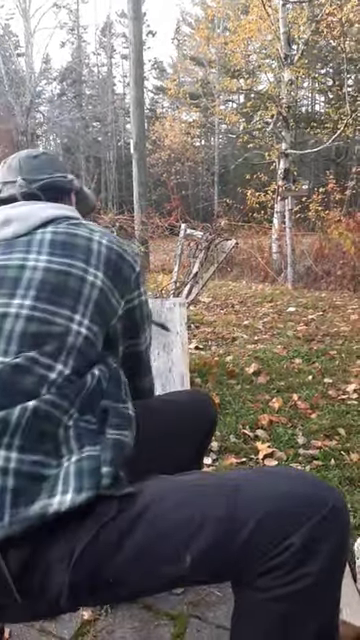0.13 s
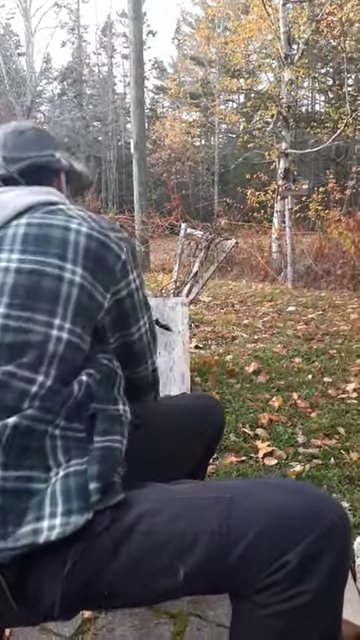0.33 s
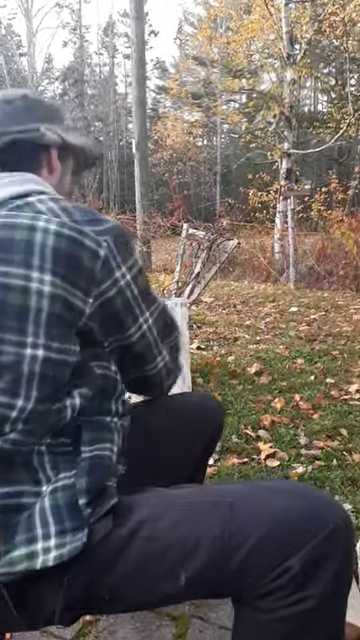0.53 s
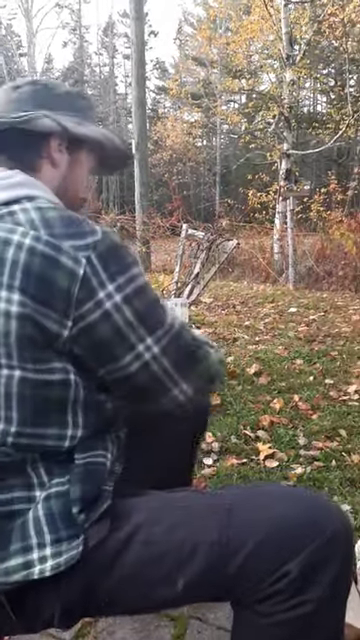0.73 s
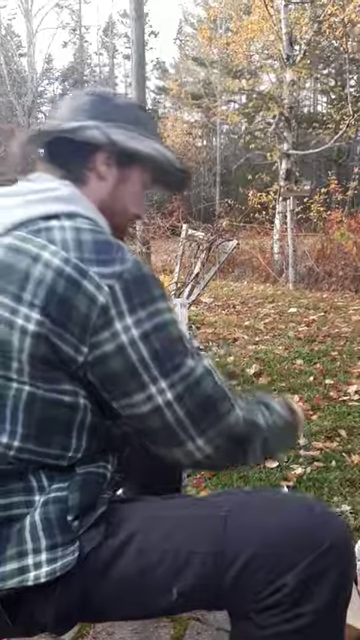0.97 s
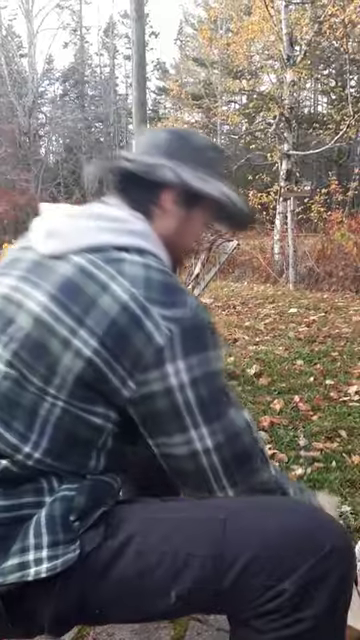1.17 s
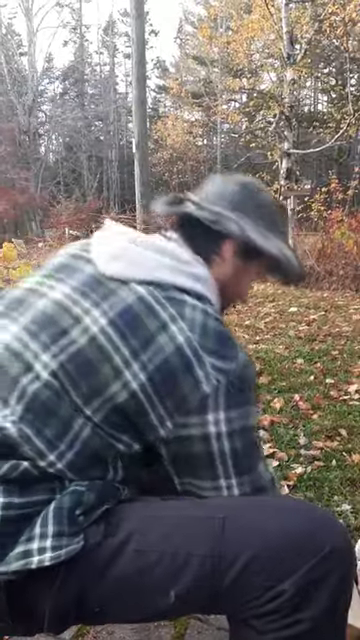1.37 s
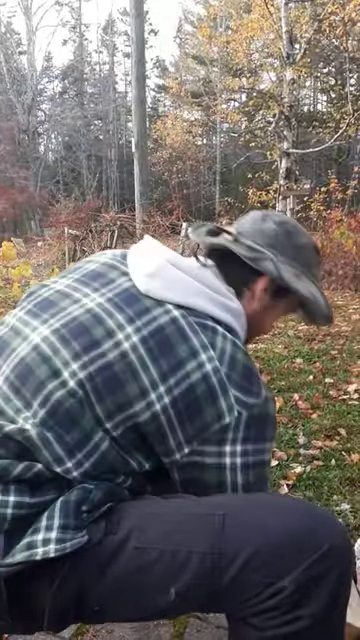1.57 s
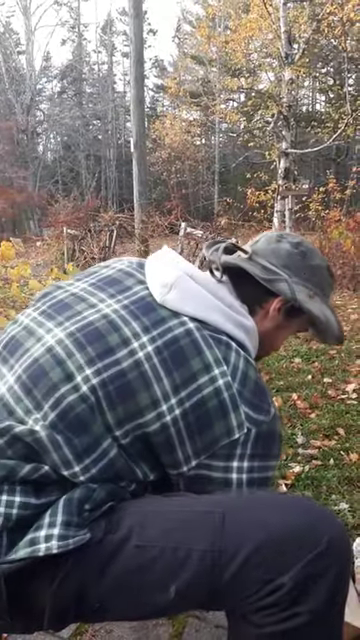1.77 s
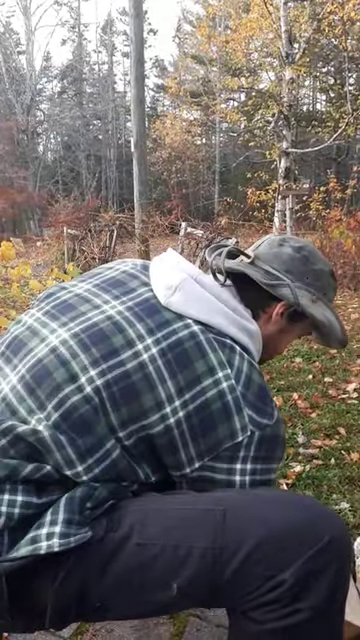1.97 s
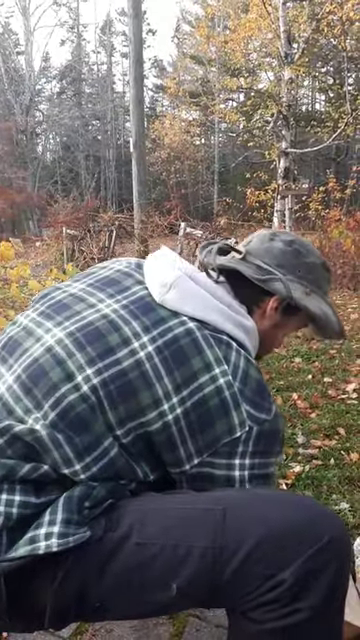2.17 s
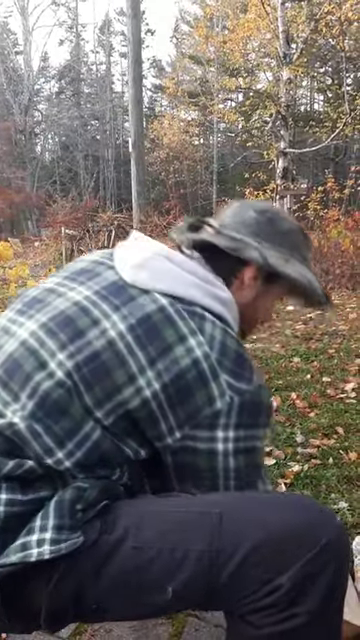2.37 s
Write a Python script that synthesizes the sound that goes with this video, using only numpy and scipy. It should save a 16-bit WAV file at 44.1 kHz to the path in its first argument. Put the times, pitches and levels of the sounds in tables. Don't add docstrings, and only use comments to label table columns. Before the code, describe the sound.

A thrown knife strikes a wooden stump a few metres off at about 0.22 s: a sharp fibre crack and short, dull, low thud, with quick tree echoes and a scattered tail fading by roughly 0.6 s. Faint cloth rustle precedes it. Quiet ticks, hollow knocks and brushing follow, notably near 1.05, 1.4 and 2.3 s, over soft leaf hiss and road hum; a distant car swells faintly around 1.6 s.

```python
import sys
import numpy as np
from scipy import signal
from scipy.fft import rfft, irfft
from scipy.io import wavfile
from scipy.ndimage import uniform_filter1d

SR = 44100
rng = np.random.default_rng(int(sys.argv[2]) if len(sys.argv) > 2 else 0)


def magnitude_from_level(level_db):
    exponent = np.asarray(level_db, float) / 20
    return 10 ** exponent


def wrap_up_sound(samples):
    columns = np.atleast_2d(samples).T
    tamed = np.clip(columns, -1, 1)
    steps = np.round(tamed * 32767).astype(np.int16)
    wavfile.write(sys.argv[1], SR, steps)


N = 105840

MS = np.array([[1, 1], [1, -1]])
# resonance in Hz, width in Hz, level in dB.
PORT = [(6850, 1100, -0.5), (4500, 1040, -15), (11470, 4000, -9), (2760, 740, -12.5), (7904, 900, -3.5)]
# frequency in Hz, density in dB per Hz.
ROAD_MID = [(15, -59.5), (25, -31), (48, -5.5), (103, 2.5), (248, -8), (330, -7.5), (444, -15), (1000, -4),
            (2600, -25.5), (3380, -29), (5720, -120)]
ROAD_SIDE = [(15, -50), (25, -8), (80, -2.5), (225, -8), (479, -12.5), (721, -4.5), (1110, -7.5),
             (2020, -9.5), (2600, -24), (3380, -43), (5720, -120)]
# frequency in Hz, density in dB per Hz.
HISS_MID = [(1350, -28.5), (2300, -8), (5160, -5), (6610, 1), (9340, -13.5), (11600, -5), (14900, -9),
            (15800, -8), (16500, -41)]
HISS_SIDE = [(1350, -33), (2300, -7), (3620, -12.5), (7180, -7), (9420, -9.5), (11200, -8), (14900, -9),
             (16000, -31), (16500, -55.5)]
# time in seconds, road in dB, leaves in dB.
SWELL = [(0, -0.5, 5), (.2, -1, 0), (.5, 1.5, 0.5), (.9, 1.5, -1), (1.3, 1, 0), (1.7, 0.5, 1), (2.05, 1, 0),
         (2.4, 0, 1.5)]
# mode in Hz, level in dB, t60 in seconds.
BLADE = [(3225, -69.5, 0.32), (4370, -71, 0.67), (5660, -68, 0.29), (6850, -106, 0.64)]
# start in seconds, length in seconds, level in dB, centre in Hz.
RUSTLES = [
    (0.019, 0.448, -68, 6500),
    (0.495, 0.28, -67, 5570),
    (1.355, 0.129, -71, 4500),
    (2, 0.097, -65.5, 11330),
    (2.286, .08, -67, 5450),
    (2.295, 0.065, -70.5, 2990),
]
# mode in Hz, t60 in seconds, swing left, swing right (peak amplitudes).
BODY = [(144, .015, .277, .304), (276, .012, .426, .432), (324, .0234, -.348, -.413),
        (450, .065, -.155, -.36)]
GRAIN = [(727, .08, .082, .035), (853, .05, .021, .025), (885, .038, -.041, -.048), (1130, .015, .062, .04)]
FIBRES = [(1017, 0.072, 0.018, 0.034), (1219, 0.04, 0.024, 0.021), (1325, 0.05, 0.0084, .008),
          (2780, 0.035, 0.008, .005), (4270, 0.02034, 0.0037, .002), (5120, .02, .003, .003),
          (5730, .015, 0.0023, 0.0017), (6750, 0.016, 0.022, 0.015)]
SPLINTERS = [(1510, .04, 0.0049, .004), (1790, 0.055, 0.013, 0.0059), (1863, 0.05, 0.006, 0.0013),
             (2247, .03, 0.0056, 0.0016)]
# start in seconds,
# peak in dB, tone in Hz, pan in dB, broad edge in dB.
TICKS = [(0.226, -43, 6500, -1, -20), (0.2287, -52.5, 8800, 2, -3), (0.2295, -46, 11500, 0, -3),
         (0.3694, -48.5, 6350, -2, -18.5), (0.5015, -51.5, 6630, -6.5, -10), (0.5539, -51, 6680, 1.0, -10),
         (0.582, -59, 3000, 0, 0), (0.5947, -52.5, 4870, -6.5, -17), (0.9357, -55.5, 6600, 1, -13.5),
         (1.0463, -56.5, 11000, 0.5, -0.5), (1.0477, -44.5, 6220, -1, -4), (1.0482, -50, 11800, -1, -5.5),
         (1.058, -55.5, 6300, 0, -13), (1.1167, -54, 8500, 4.5, -2), (1.118, -56, 5660, 7, -9),
         (1.2196, -52, 6590, -3, -5.5), (1.2377, -56, 6600, 5.5, -10.5), (1.37, -61, 6500, -0.5, -15),
         (1.377, -45, 6474, 0, -4), (1.377, -49, 4710, -0.5, -0.5), (1.3786, -49, 6970, 0.5, -5.5),
         (1.3894, -54, 6330, -5, -4.5), (1.4025, -54.5, 6500, 0.5, -15), (1.4056, -51, 6480, 0.5, -12),
         (1.4506, -56, 6400, -1, -14.5), (1.4608, -43, 6700, -4, -11), (1.4616, -49.5, 4700, -3, -4.5),
         (1.7264, -62.5, 6930, 4.5, -0.5), (2.2975, -55, 4200, -12, -12), (2.3004, -50.5, 6700, -2, -6),
         (2.302, -44, 6230, -5, -10), (2.3148, -46.5, 4270, -6, -12), (2.3158, -51.5, 6700, -0.5, -7),
         (2.319, -55.5, 4230, 1, -18.5), (2.3363, -59, 7200, 2.0, -9), (2.3385, -51, 4700, 2, -11),
         (2.343, -55.5, 7100, 7, -7.5), (2.3564, -59.5, 6830, 0.5, -5.5)]
# start in seconds, peak in dB, tone in Hz, pan in dB.
TRUNKS = [(.228, -40, 1840, 2), (.232, -44, 1200, -3), (.237, -46.5, 1800, 2), (.24, -36.5, 1250, 4.5),
          (.247, -48.5, 1800, 6), (.253, -50, 1240, 0), (.262, -59, 1150, 0), (.277, -44.5, 1150, -2),
          (.283, -48, 1220, 4.5), (.291, -51, 1394, -5), (.277, -48, 716, 12.5), (.293, -47.5, 671, 5.5),
          (.3, -48, 730, 11), (.319, -53, 925, 2.5), (.334, -51.5, 888, 8), (.35, -48.5, 830, 5),
          (.397, -56.5, 1090, 0.5), (.399, -57, 1745, -1.5), (.45, -54, 1110, 0), (.48, -55.5, 1000, 0)]
# delay in seconds, level in dB, top in Hz, side share (ratio).
ECHOES = [(0.0135, -15, 200, 0.035), (.025, -27, 400, 0), (.035, -18, 200, 0.021),
          (0.054, -28, 300, -0.204), (.065, -29.5, 348, 0.061), (0.075, -29.5, 915, -0.021),
          (.087, -36, 262, 0.034), (0.102, -28, 168, 0.081), (.108, -22.5, 170, -0.072)]
# centre in Hz, width in Hz, level in dB, t60 in seconds.
WOODS = [(182.8, 110, -39, .24), (331.55, 200, -44, 0.34), (731.7, 270, -54.5, 0.47),
         (1150, 400, -56, 0.55), (1900, 1015, -59.5, 0.308), (7460, 14000, -59.5, 0.2)]
# start in seconds, peak in dB, tone in Hz, pan in dB.
KNOCKS = [(.554, -57, 1563, -12), (.583, -56.5, 2480, 7.5), (.976, -51.5, 1860, 3),
          (1.239, -59, 1900, -2.5), (1.278, -54, 782, 8), (1.3776, -52.5, 1883, 8),
          (1.3772, -52.5, 3030, 6), (1.461, -58, 2980, -3), (1.048, -58, 2610, 0),
          (1.378, -52.5, 1377, -5.5), (1.378, -55.5, 822, 12), (1.725, -53, 1558, -4.5),
          (1.727, -54, 854, 9), (2.006, -58, 109.5, 0.5), (2.021, -59, 1520, -13.5), (2.178, -57.5, 142, 3),
          (2.316, -72, 1100, -4), (2.318, -58, 1992, 13.5), (2.348, -54.5, 1990, 8)]

ROAD_MID_DB, ROAD_SIDE_DB = -64.5, -71.5
HISS_MID_DB, HISS_SIDE_DB = -68.5, -70
CRACKLE_PER_S, CRACKLE_DB, CRACKLE_T60_S = 300, -71.5, .008
RUSTLE_PER_S, GRAIN_SPREAD_DB = 1800, 6.5
TIP_S, TIP_DB, TIP_HOLD_S, TIP_T60_S = .2154, -33, .004, .0076
SCRATCH_S, SCRATCH_LENGTH_S = .2168, .0002
BITE_S, BITE_LENGTH_S = .21736, .0012
PUSH_S, PUSH_LENGTH_S = .21755, .00177
SPLIT_S, SPLIT_LENGTH_S = .2184, .0002
GROUND_SHARE, GROUND_LAG_S, RIGHT_LEAD_S = .57, .00358, .00014
LOW_HZ, RUMBLE_CUT_HZ = 95, 33
BOOM_HZ, BOOM_WIDTH_HZ, BOOM_CUT = 52.7, 16, .65
TICK_SPAN_S, TICK_WIDTH_HZ, TICK_T60_S, EDGE_T60_S = .04, 1100, .009, .008
TICK_SIDE, TICK_GRIT = .5124, .37
WOODS_LAG_S, WOODS_RISE_S, WOODS_SIDE = .029, .0038, .4
KNOCK_CYCLES = 13
CAR_HZ, CAR_WIDTH_HZ, CAR_S, CAR_SPAN_S, CAR_DB = 730, 140, 1.62, .27, -69.5
TOP_HZ = 15450


def ring(x, hz, t60_s):
    pole = np.exp(2j * np.pi * hz / SR - np.log(1000) / (max(t60_s, .003) * SR))
    return signal.lfilter([1], [1, -pole], x).imag


def band(x, hz, width_hz):
    return signal.lfilter(*signal.iirpeak(hz, hz / width_hz, SR), x)


def high_pass(x, hz):
    return signal.lfilter(*signal.butter(2, hz, "high", fs=SR), x)


def unit(x):
    return x / np.sqrt(np.mean(x ** 2))


def fade(start_s, t60_s, rise_s=0.000102):
    t = np.maximum(np.arange(N) / SR - start_s, 0)
    return (1 - np.exp(-t / rise_s)) * magnitude_from_level(-60 * t / t60_s)


def pan(pan_db):
    return np.array([[pan_db], [-pan_db]]) / 2


def walk(rate_hz):
    k = int(SR / rate_hz)
    steps = np.repeat(rng.standard_normal(N // k + 1), k)[:N]
    return unit(uniform_filter1d(uniform_filter1d(steps, k), k))


def port(x):
    return sum((-1) ** k * magnitude_from_level(db) * band(x, hz, width_hz) for k, (hz, width_hz, db) in enumerate(PORT))


def coloured(table, flicker_db, rate_hz):
    octave = np.log2(np.maximum(np.fft.rfftfreq(N, 1 / SR), 1))
    hz, db = np.array(table).T
    colour = magnitude_from_level(np.interp(octave, np.log2(hz), db, left=-90, right=-90))
    spectrum = rfft(rng.standard_normal(N)) * colour
    out = np.zeros(N)
    for centre in np.arange(4, 14.6, .5):
        part = irfft(spectrum * np.clip(1 - 2 * abs(octave - centre), 0, 1), N)
        out += part * magnitude_from_level(flicker_db * walk(rate_hz))
    return unit(out)


def grains(per_s):
    size_db = GRAIN_SPREAD_DB * rng.exponential(size=(2, N)).clip(0, 2.4)
    return (rng.random((2, N)) < per_s / SR) * magnitude_from_level(size_db)


def knock(start_s, peak_db, hz, pan_db):
    t = np.arange(N) / SR
    tone = fade(start_s, KNOCK_CYCLES / hz, rise_s=0.45 / hz) * np.sin(2 * np.pi * hz * (t - start_s))
    return magnitude_from_level(peak_db + pan(pan_db)) * tone / abs(tone).max()


def swell(column):
    c = np.array(SWELL)
    return magnitude_from_level(np.interp(np.arange(N) / SR, c[:, 0], c[:, column]))


def road_hum():
    mid = magnitude_from_level(ROAD_MID_DB) * coloured(ROAD_MID, 0.82, 3.9)
    side = magnitude_from_level(ROAD_SIDE_DB) * coloured(ROAD_SIDE, 1.5, 6)
    return np.array([mid, side]) * swell(1)


def leaf_hiss():
    mid = magnitude_from_level(HISS_MID_DB) * coloured(HISS_MID, 0.42, 12)
    side = magnitude_from_level(HISS_SIDE_DB) * coloured(HISS_SIDE, 0.66, 12)
    return np.array([mid, side]) * swell(2)


def crackle():
    tail = signal.lfilter([1], [1, -magnitude_from_level(-60 / (CRACKLE_T60_S * SR))], grains(CRACKLE_PER_S))
    return magnitude_from_level(CRACKLE_DB) * unit(port(tail * rng.standard_normal((2, N))))


def blade():
    t = np.arange(N) / SR
    rings = sum(magnitude_from_level(db - 60 * t / t60_s) * np.sin(2 * np.pi * hz * t) for hz, db, t60_s in BLADE)
    return rings * (t < TIP_S)


def rustles():
    t, out = np.arange(N) / SR, np.zeros((2, N))
    cloth = grains(RUSTLE_PER_S) * np.sign(rng.standard_normal((2, N)))
    for start_s, length_s, db, hz in RUSTLES:
        move = np.sin(np.pi * np.clip((t - start_s) / length_s, 0, 1))
        out += magnitude_from_level(db) * unit(band(cloth, hz, hz * 0.28)) * move
    return out


def tip():
    t, end_s = np.arange(N) / SR, TIP_S + TIP_HOLD_S
    env = np.where(t < end_s, t > TIP_S, fade(end_s, TIP_T60_S, rise_s=1e-6))
    return magnitude_from_level(TIP_DB) * port(env * rng.standard_normal((2, N))) * [[1], [.7]]


def thud():
    t = np.arange(N) / SR + np.array([[0], [RIGHT_LEAD_S]])
    out = np.zeros((2, N))
    for start_s, length_s, modes in ((SCRATCH_S, SCRATCH_LENGTH_S, FIBRES), (BITE_S, BITE_LENGTH_S, GRAIN),
                                     (PUSH_S, PUSH_LENGTH_S, BODY), (SPLIT_S, SPLIT_LENGTH_S, SPLINTERS)):
        force = np.zeros((2, N))
        for share, lag_s in ((1, 0), (GROUND_SHARE, GROUND_LAG_S)):
            force += share * np.sin(2 * np.pi * np.clip((t - start_s - lag_s) / length_s, 0, 1))
        for hz, t60_s, left, right in modes:
            tone = high_pass(ring(force, hz, t60_s), LOW_HZ)
            out += tone / abs(tone).max() * [[left], [right]]
    hit = high_pass(MS @ out / 2, RUMBLE_CUT_HZ)
    return hit - BOOM_CUT * band(hit, BOOM_HZ, BOOM_WIDTH_HZ)


def ticks():
    noise, out, span = rng.standard_normal((2, N)), np.zeros((2, N)), int(TICK_SPAN_S * SR)
    t = np.arange(span) / SR
    for start_s, peak_db, hz, pan_db, edge_db in TICKS:
        i = int(start_s * SR)
        burst = noise[0, i:i + span] + TICK_SIDE * noise[1, i:i + span] * [[1], [-1]]
        short = magnitude_from_level(-60 * t / EDGE_T60_S) * burst
        edge = port(short) + 1.4 * band(short, 4000, 6000)
        grit = unit(band(burst, hz, TICK_WIDTH_HZ))
        env = magnitude_from_level(-60 * t / TICK_T60_S) * (1 - np.exp(-t * hz))
        tone = env * (np.sin(2 * np.pi * hz * t) + TICK_GRIT * grit)
        snap = tone + magnitude_from_level(edge_db) * edge / abs(edge).max()
        out[:, i:i + span] += magnitude_from_level(peak_db + pan(pan_db)) * snap / abs(snap).max()
    return out


def trunks():
    return sum(knock(*row) for row in TRUNKS)


def echoes(hit):
    out = np.zeros((2, N))
    for delay_s, db, top_hz, side in ECHOES:
        copy = signal.lfilter(*signal.butter(3, top_hz, fs=SR), np.roll(hit[0], int(delay_s * SR)))
        out += magnitude_from_level(db) * np.outer([1, side], copy)
    return out


def woods():
    out = np.zeros((2, N))
    for hz, width_hz, db, t60_s in WOODS:
        noise = band(band(rng.standard_normal((2, N)), hz, width_hz), hz, width_hz)
        env = fade(PUSH_S + WOODS_LAG_S, t60_s, WOODS_RISE_S)
        out += magnitude_from_level(db) * unit(noise) * env * [[1], [WOODS_SIDE]]
    return out


def knocks():
    return sum(knock(*row) for row in KNOCKS)


def car():
    roar = band(band(rng.standard_normal((2, N)), CAR_HZ, CAR_WIDTH_HZ), CAR_HZ, CAR_WIDTH_HZ)
    passing = np.exp(-.5 * ((np.arange(N) / SR - CAR_S) / CAR_SPAN_S) ** 2)
    return magnitude_from_level(CAR_DB + walk(10.8)) * unit(roar) * passing * [[1], [.5]]


def scene():
    hit = thud()
    mid_side = road_hum() + leaf_hiss() + tip() + hit + echoes(hit) + woods() + car()
    return MS @ mid_side + crackle() + blade() + rustles() + ticks() + trunks() + knocks()


def band_limit(x):
    return signal.sosfilt(signal.butter(12, 16780, fs=SR, output="sos"), x)


def record(dry):
    lift = band(dry, 1800, 1800) * .1 + band(dry, 8200, 3000) * .15
    top_cut = signal.ellip(12, .3, 60, TOP_HZ, fs=SR, output="sos")
    mix = signal.sosfilt(top_cut, dry + lift * [[1], [-1]])
    return band_limit(mix)


dry = scene()
out = record(dry)
wrap_up_sound(out)
```